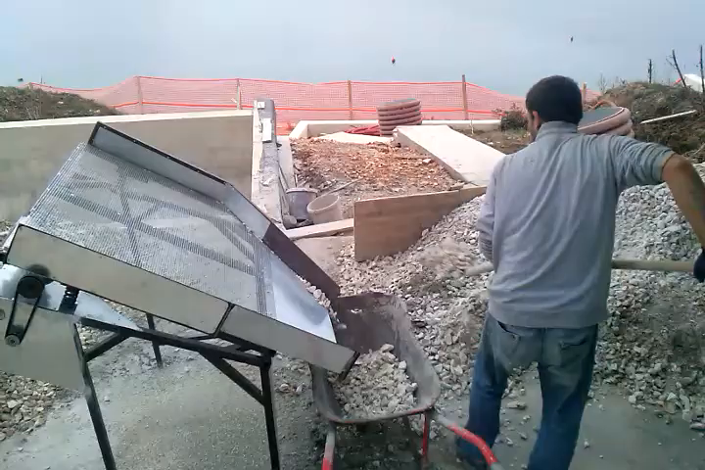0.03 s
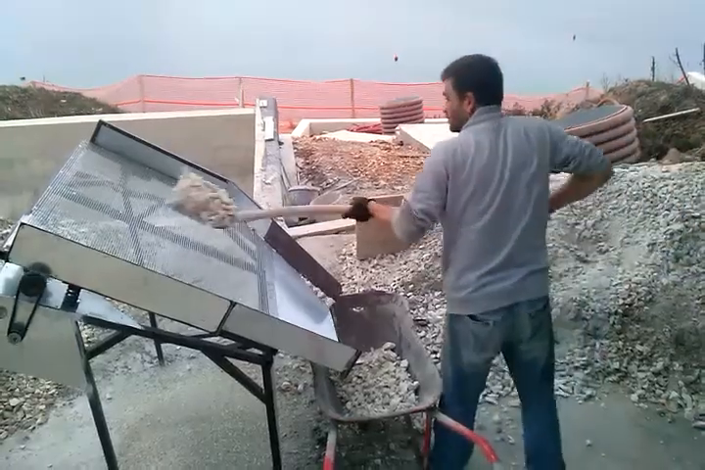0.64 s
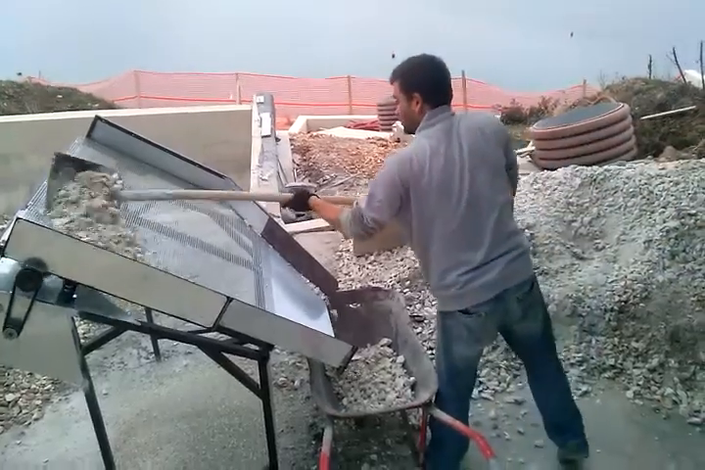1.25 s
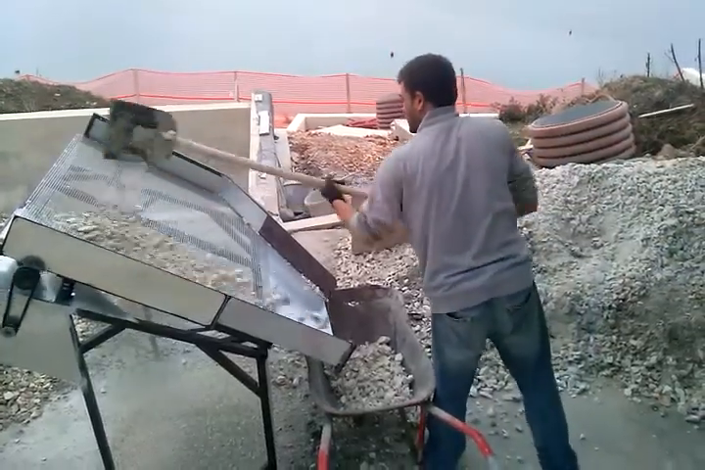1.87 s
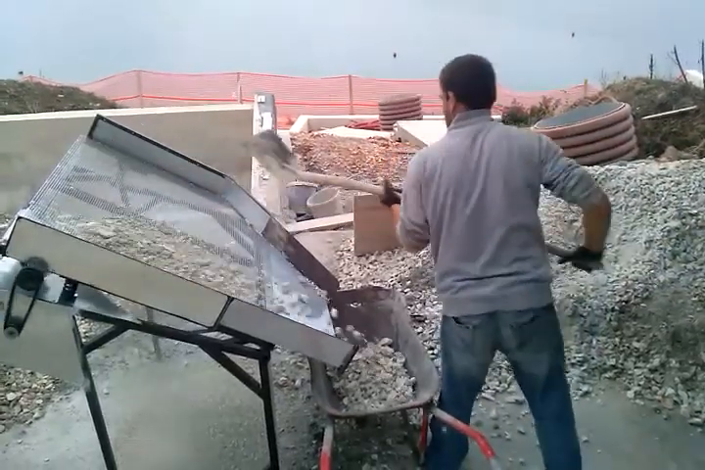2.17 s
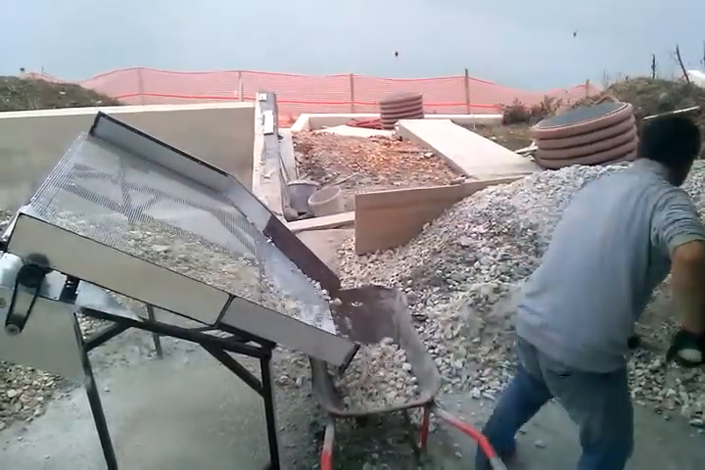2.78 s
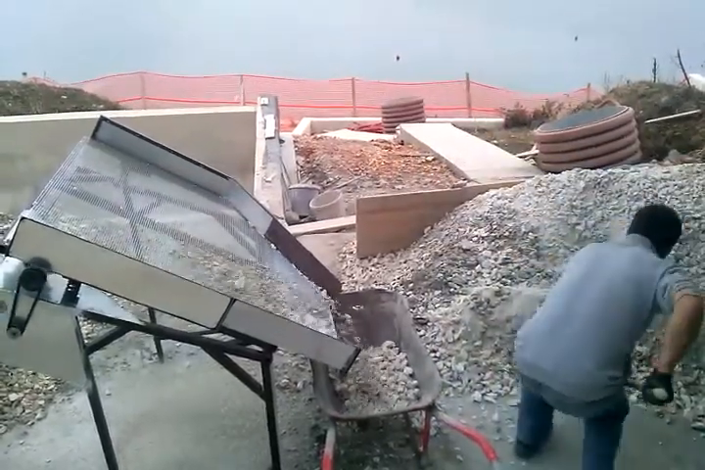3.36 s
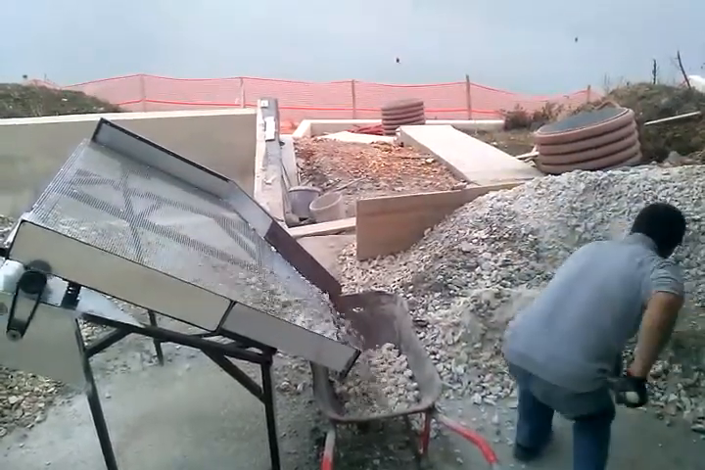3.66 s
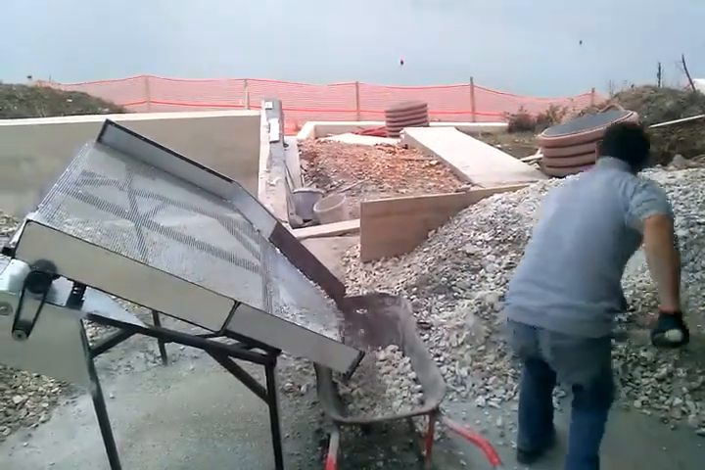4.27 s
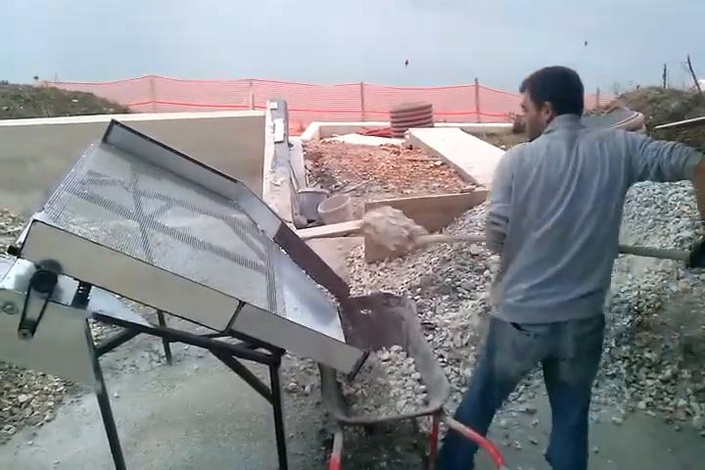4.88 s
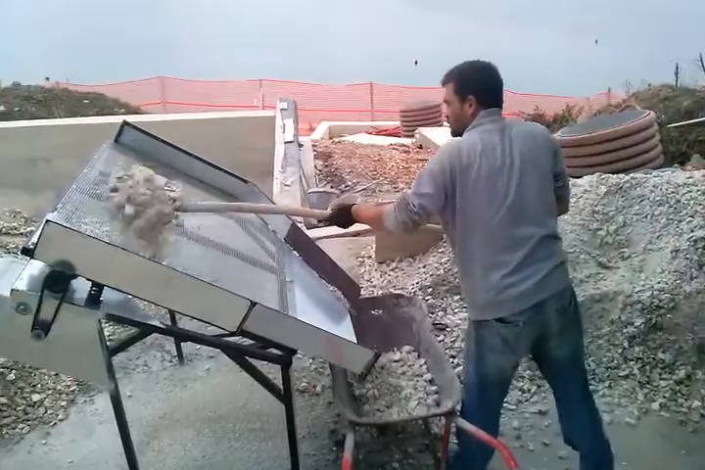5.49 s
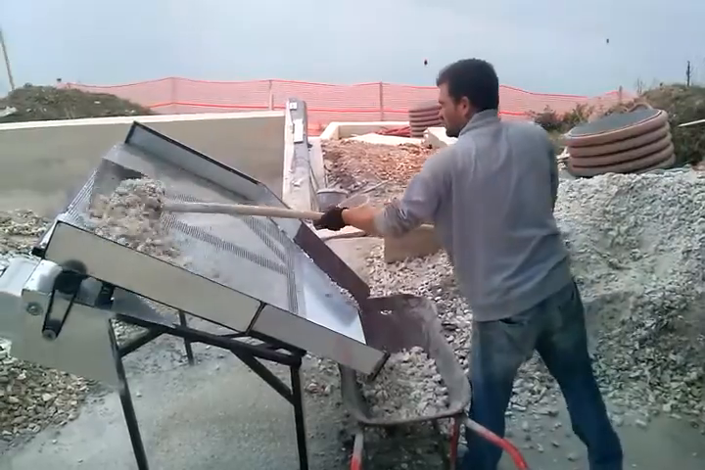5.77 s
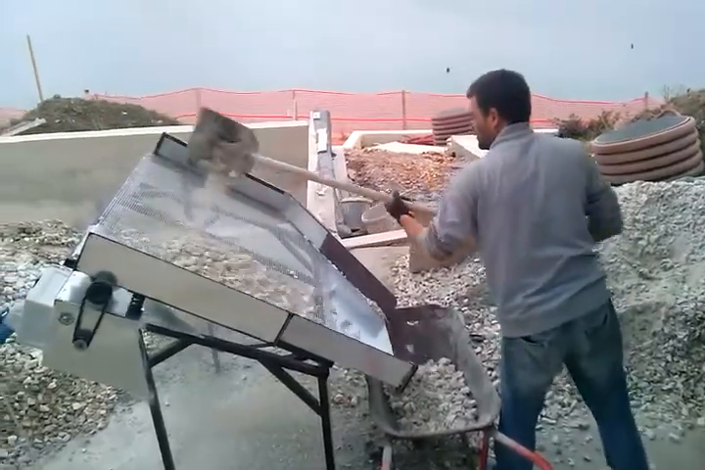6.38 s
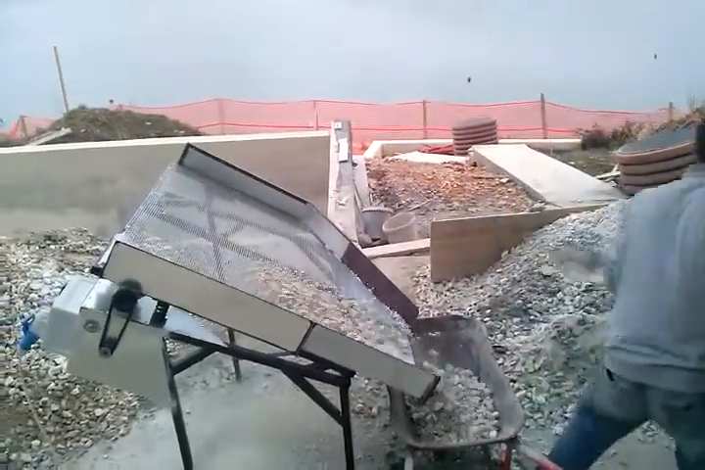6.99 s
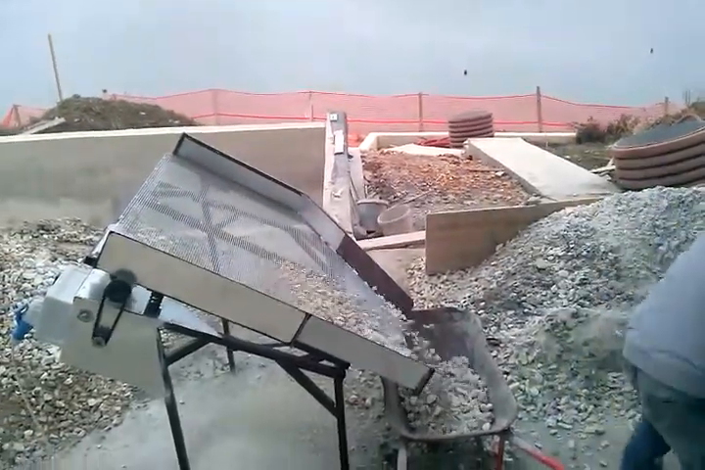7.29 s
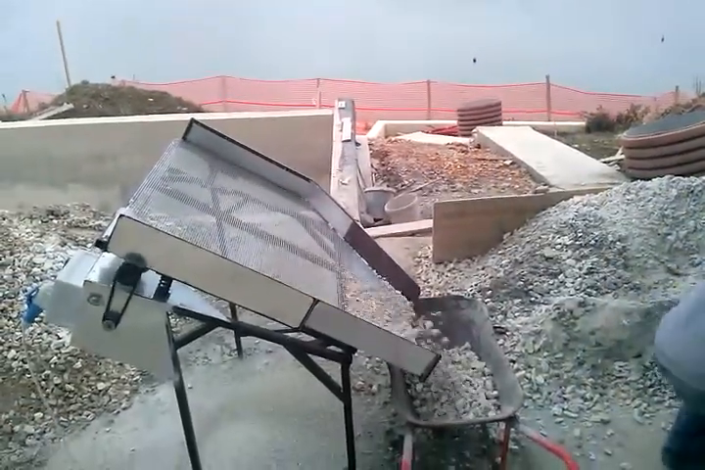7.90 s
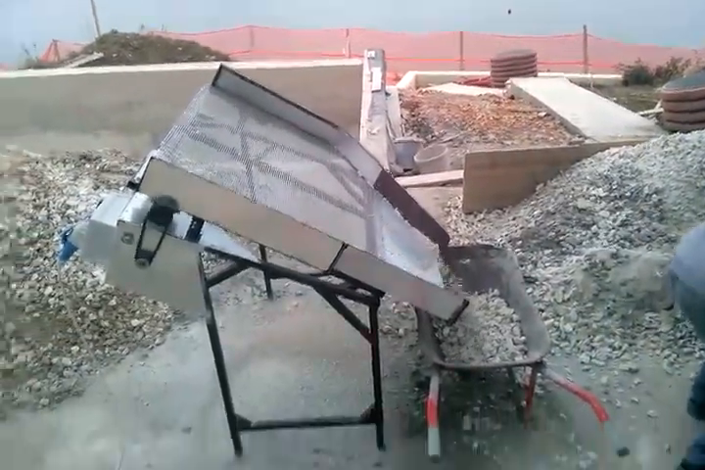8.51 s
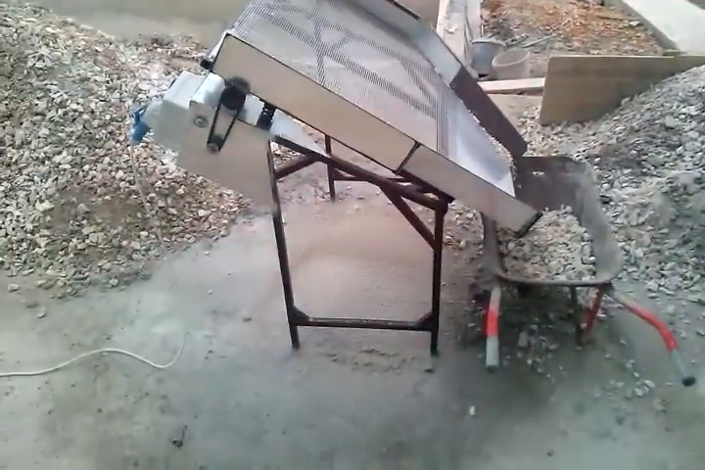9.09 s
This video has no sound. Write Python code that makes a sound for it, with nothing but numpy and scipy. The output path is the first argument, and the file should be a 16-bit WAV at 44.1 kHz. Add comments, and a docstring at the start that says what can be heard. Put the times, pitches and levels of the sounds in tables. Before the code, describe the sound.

An electric vibrating screen rattles and hums steadily as shovelled gravel thuds onto its steel tray, with light wind.

```python
"""Gravel screen at work

Outdoors, one microphone on an electric vibrating screen, already running as the sound cuts in.
An eccentric shaft shakes the steel tray 26 times a second: the frame hums and chatters, stones drum
on the deck and grit sizzles on the mesh. Shovelled clumps thud onto the deck, the shovel crunches
into the heap, and wind ruffles the microphone."""
import sys
import numpy as np
from scipy import signal
from scipy.fft import rfft, irfft
from scipy.io import wavfile

SR = 44100
rng = np.random.default_rng(int(sys.argv[2]) if len(sys.argv) > 2 else 0)


def to_wav(sig):
    """Store sig (one row per channel, or 1-D mono) as 16-bit WAV at the path in sys.argv[1].

    Samples outside -1..1 are clipped; the rate is SR.
    """
    pcm = np.clip(np.atleast_2d(sig), -1, 1) * 32767
    pcm = np.round(pcm).astype(np.int16)
    wavfile.write(sys.argv[1], SR, pcm.T)  # frames by channels


N = 407925
T = np.arange(N) / SR


def undb(db):
    """Decibels to gain."""
    return 10 ** (np.asarray(db) / 20)


def unit(x):
    """Scale to rms 1."""
    return x / np.sqrt(np.mean(x ** 2))


def curves(table):
    """Each column after t/s as a control over time."""
    times, *columns = np.transpose(table)
    return [np.interp(T, times, column) for column in columns]


def swell(at_s, half_s):
    """A smooth hump of height 1 around at_s."""
    return np.exp(-((T - at_s) / half_s) ** 2)


def colour(x, outline):
    """Filter by an outline (f/Hz, level/dB) and scale to rms 1."""
    hz, db = np.transpose(outline)
    f = np.maximum(np.fft.rfftfreq(2 * N, 1 / SR), 1)
    gain = undb(np.interp(np.log(f), np.log(hz), db))
    return unit(irfft(rfft(x, 2 * N) * gain)[:N])


def ring(x, modes):
    """Sum of resonances (f/Hz, width/Hz, level/dB) driven by x."""
    return sum(undb(db) * signal.lfilter(*signal.iirpeak(hz, hz / width, fs=SR), x)
               for hz, width, db in modes)


def walk(hz):
    """Smooth random drift of rms 1, changing up to about hz times a second."""
    ticks = np.arange(0, N / SR + .01, .001)
    f = np.fft.rfftfreq(len(ticks), ticks[1])
    slow = irfft(rfft(rng.standard_normal(len(ticks))) * np.exp(-(f / hz) ** 2), len(ticks))
    return np.interp(T, ticks, unit(slow))


def impacts(per_s, spread_db):
    """Random clicks, many small and a few large."""
    hit = rng.random(N) < per_s / SR
    size = undb(spread_db * np.minimum(rng.exponential(size=N), 6))
    return hit * size * rng.choice([-1, 1], N)


def wind():
    """Gusts buffet the microphone, mostly in the deep bass."""
    # wind on the microphone: t/s, level/dB
    gusts = [(0.85, -32), (0.89, -28.5), (1.67, -23.5), (2.02, -32), (2.14, -24), (2.32, -35.5),
             (3.51, -26), (3.91, -36), (4.08, -19), (4.33, -36), (5.69, -24), (6.0, -30), (6.84, -29),
             (7.0, -37), (7.05, -28), (7.12, -45), (7.24, -33.5), (8.31, -47), (8.71, -32), (9.25, -41)]
    # spectrum of the buffeting: f/Hz, relative level/dB
    buffet = [(12, -26), (25, -3), (40, 3.5), (75, 5), (130, 2.5), (220, -5), (400, -23), (900, -57)]
    gust_db, = curves(gusts)
    rumble = colour(rng.standard_normal(N), buffet)
    flutter_db = 2.2 * walk(hz=17)
    return rumble * undb(gust_db + flutter_db)


def shovel():
    """At the heap, the blade crunches through loose stones in small jerks, and they set it ringing."""
    # digs: hardest push t/s, half length/s, crunch level/dB, blade level/dB
    digs = [(3.325, 0.075, -13, -21), (6.808, 0.04, -30, -20.5), (7.81, 0.088, -12, -30)]
    # spectrum of the crunching heap: f/Hz, relative level/dB
    heap = [(300, -33), (800, 11.5), (1400, -3), (2100, 9), (3300, 3.5), (4400, 9.5), (6000, 4.5),
            (9000, -10), (15000, -33)]
    # modes of the blade: f/Hz, width/Hz, relative level/dB
    blade_modes = [(1980, 490, -9), (2650, 170, -9), (3230, 67, 2)]
    crunch_gain, blade_gain = 0, 0
    for at_s, half_s, crunch_db, blade_db in digs:
        push = np.exp(-np.abs((T - at_s) / half_s) ** 3)
        crunch_gain += undb(crunch_db) * push
        blade_gain += undb(blade_db) * push
    jerks = undb(2.0 * walk(hz=50))
    clicks = impacts(per_s=3000, spread_db=3.5) * jerks
    slips = impacts(per_s=1500, spread_db=0) * jerks
    return colour(clicks, heap) * crunch_gain + unit(ring(slips, blade_modes)) * blade_gain


def frame(turn):
    """The shaft shakes the frame; each tone wavers as the load shifts on it."""
    # tones of the frame: multiple of the shaft rate, relative level/dB
    orders = [(6, -3.5), (7, -10.5), (10, -12), (11, 1.5), (13, 0), (14, -8.5), (17, -2), (38, -5.5),
              (46.5, -1.5)]
    tones = 0
    for order, db in orders:
        waver_db, slip_rad = 2.1 * walk(hz=5), .45 * walk(hz=3)
        tones += undb(db + waver_db) * np.sin(2 * np.pi * order * turn + slip_rad)
    return undb(-29) * unit(tones)


def chatter(turn, joints=14):
    """Loose joints knock at the same places in every turn, never quite alike."""
    jitter_s, spread_db = 0.00019, 0.85
    knocks = np.zeros(N)
    whole_turns = np.arange(1, int(turn[-1]) - 1)
    for place, direction in zip(rng.random(joints), np.sign(rng.standard_normal(joints))):
        late, force = rng.standard_normal((len(whole_turns), 2)).T
        at_s = np.interp(whole_turns + place, turn, T) + jitter_s * late
        knocks[(at_s * SR).astype(int)] += direction * undb(spread_db * force)
    return knocks


def clumps():
    """Each clump lands as a short shower: the tray clatters and rings at a pitch set by where it hits."""
    # clumps and stones landing: t/s, clatter level/dB, panel ring level/dB, ring f/Hz
    landings = [(1.054, -16, -11, 403), (1.262, -14, -9, 365), (1.482, -13.5, -10, 332),
                (1.504, -12, -9, 404), (1.7, -12, -6, 345), (2.097, -14, -14, 1740),
                (2.207, -10, -18, 1260), (2.821, -11.5, -13.5, 738), (3.141, -13, -27, 410),
                (5.239, -5, -2.5, 1714), (5.248, -20, -14, 255), (5.298, -23, -15, 230),
                (5.671, -16, -19, 956)]
    # modes of the steel tray: f/Hz, width/Hz, relative level/dB
    tray_modes = [(110, 190, 10.5), (278, 87, 11.5), (416, 100, -2), (745, 280, 5), (1160, 500, -4),
                  (1650, 180, 10.5), (1900, 310, -30), (2620, 400, -2), (4300, 590, -11)]
    clatter_decay_s, ring_peak_s = 0.019, 0.0051
    shower, boom = np.zeros(N), np.zeros(N)
    clicks = impacts(per_s=9000, spread_db=1.5)
    for at_s, clatter_db, ring_db, hz in landings:
        age = np.maximum(T - at_s, 0)
        shower += undb(clatter_db) * np.exp(-age / clatter_decay_s) * (age > 0)
        build = age / ring_peak_s
        boom += undb(ring_db) * build * np.exp(1 - build) * np.sin(2 * np.pi * hz * age)
    clatter = ring(clicks * shower, tray_modes) / np.std(ring(clicks, tray_modes))
    ragged = 1 + .45 * walk(hz=100)
    return clatter + boom * ragged


def load_levels():
    """Stone and grit levels in dB: a shovelful rushes through the mesh, chokes the deck, then spreads."""
    # how hard the load dances, building up and then staying near full: t/s, relative level/dB
    dance = [(.85, -5.5), (2.1, 0), (3.2, -1.26), (4.8, .5), (7.8, 0.25), (9.25, -0.8)]
    # shovelfuls tipped onto the screen: t/s, rise in grit level/dB
    pours = [(1.13, 0.5), (5.58, 2)]
    dance_db, = curves(dance)
    stones_db, grit_db = dance_db - 18, dance_db - 11
    for at_s, rush_db in pours:
        choke_db = -1.5 * swell(at_s + 0.51, half_s=0.26)  # the fresh pile damps the deck
        bounce_db = swell(at_s + 0.71, half_s=0.71)  # it breaks up and its stones bounce freely
        stones_db += choke_db + bounce_db
        grit_db += choke_db + rush_db * swell(at_s, half_s=0.097)
    return stones_db, grit_db


def toss(turn, once, twice):
    """Factor on the impact rate: the load lands hardest once a turn, and again on the return stroke."""
    return np.exp(once * np.cos(2 * np.pi * turn) + twice * np.cos(4 * np.pi * turn))


def stones(turn):
    """Coarse stones bounce down the deck and set the side panels ringing."""
    # modes of the tray's side panels: f/Hz, width/Hz, relative level/dB
    panel_modes = [(1440, 24, -3.5), (1580, 25, -4.5), (1650, 44, -8)]
    clicks = impacts(per_s=4200 * toss(turn, once=.12, twice=.1), spread_db=1.5)
    return clicks + ring(clicks, panel_modes)


def deck(turn, stones_db):
    """The steel deck sounds under the knocking joints and the drumming stones."""
    # spectrum of the struck deck: f/Hz, relative level/dB
    steel = [(80, -36), (140, -12), (230, -5.5), (300, -3.5), (490, -3), (610, -9.5), (810, -4),
             (930, -5.5), (1330, -3), (1430, -3), (1720, -2.5), (2000, -7), (2300, -16), (3200, -20.5),
             (5500, -60)]
    knocking = undb(-26.5) * colour(chatter(turn), steel)
    drumming = colour(stones(turn), steel) * undb(stones_db + 0.87 * walk(hz=13))
    return knocking + drumming


def grit(turn, level_db):
    """Fine grit ticks on the wires of the mesh, dense enough to sizzle."""
    # spectrum of grit on the mesh: f/Hz, relative level/dB
    sizzle = [(1350, -39), (2300, -13.5), (2760, -7), (3240, -7), (3780, -6.5), (4540, -4), (5000, -5.5),
              (5420, -4), (5820, -1.5), (6360, -2.5), (8550, 3), (10000, -7.5), (11600, -9.5), (12800, -17),
              (15600, -18)]
    # modes of the wire mesh: f/Hz, width/Hz, relative level/dB
    wire_modes = [(2720, 310, -8), (3274, 160, -4.5), (4300, 360, -16.5), (5850, 105, -3),
                  (7730, 340, -15.5), (8900, 230, -13)]
    clicks = impacts(per_s=14000 * toss(turn, once=.04, twice=.028), spread_db=2.0)
    return colour(clicks + ring(clicks, wire_modes), sizzle) * undb(level_db + 0.73 * walk(hz=26))


def scene():
    """Screen, shovel and wind in the open air, in mono on both channels."""
    # rate of the eccentric shaft, slowing a little: t/s, f/Hz
    shaft_rate = [(0, 26.04), (4.2, 26.02), (5.0, 25.95), (5.9, 25.82), (7.8, 25.77), (9.25, 25.84)]
    shaft_hz, = curves(shaft_rate)
    turn = np.cumsum(shaft_hz) / SR  # shaft angle in turns
    stones_db, grit_db = load_levels()
    screen = frame(turn) + deck(turn, stones_db) + grit(turn, grit_db) + clumps()
    mono = screen + shovel() + wind()
    return np.array([mono, mono])


def record(dry):
    """The sound cuts in; the recorder, overloaded by the din, flattens the peaks and cuts the top."""
    start_s, ceiling, top_hz = .838, .73, 15600
    clipped = dry / (1 + np.abs(dry / ceiling) ** 10) ** (1 / 10)
    lowpass = signal.ellip(10, .05, 60, top_hz, fs=SR, output="sos")
    return signal.sosfiltfilt(lowpass, clipped * (T >= start_s))


dry = scene()
out = record(dry)
to_wav(out)
```